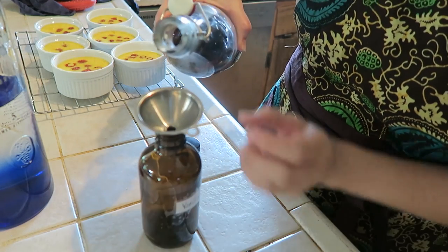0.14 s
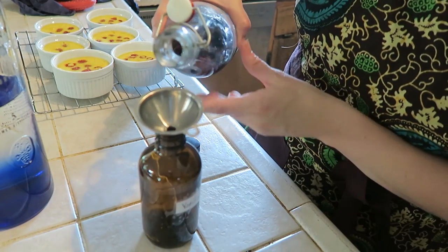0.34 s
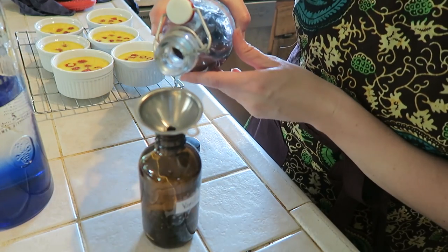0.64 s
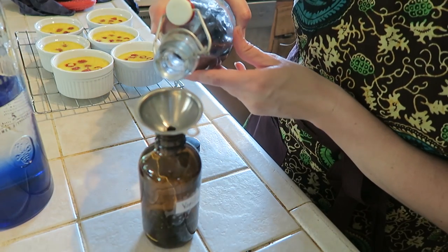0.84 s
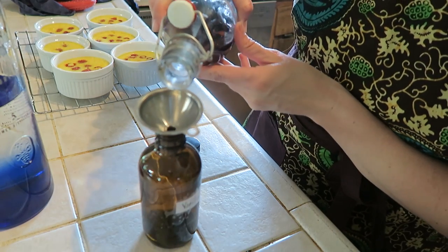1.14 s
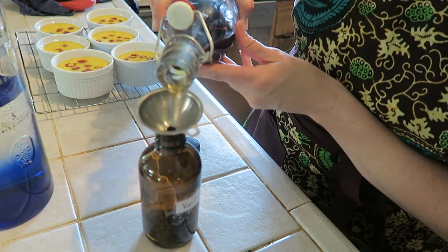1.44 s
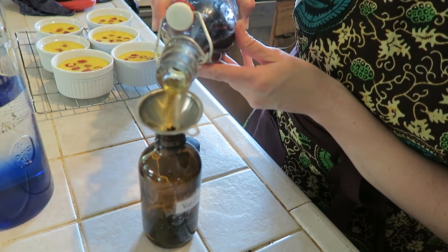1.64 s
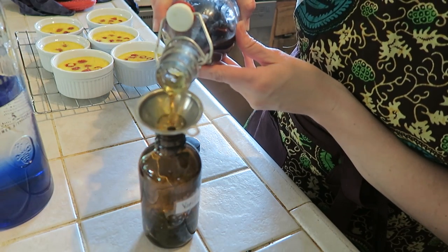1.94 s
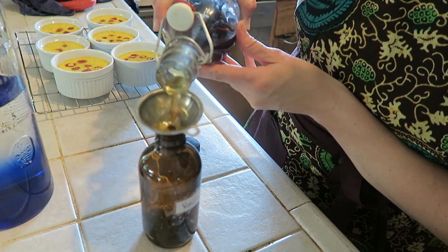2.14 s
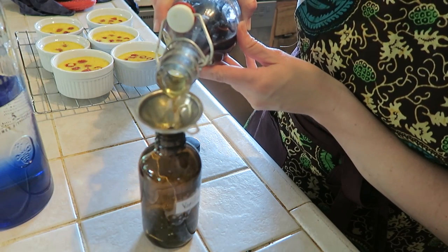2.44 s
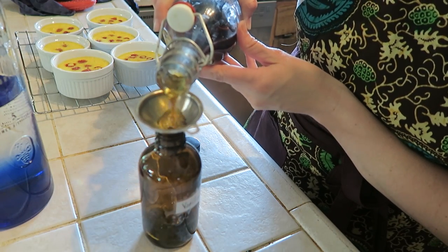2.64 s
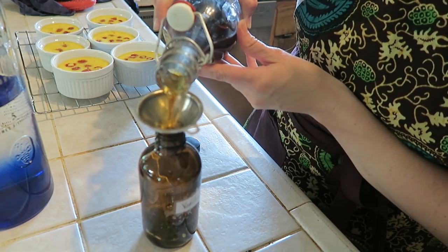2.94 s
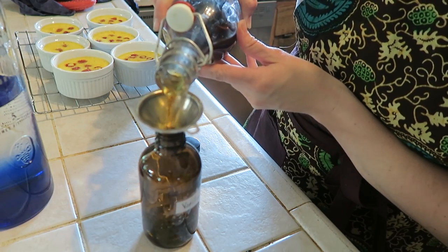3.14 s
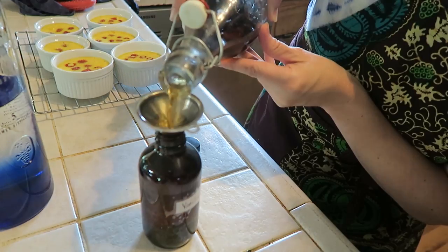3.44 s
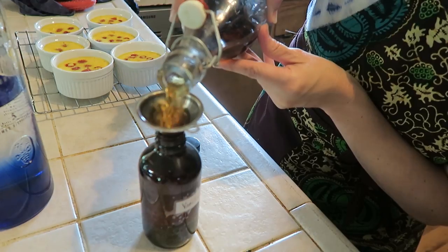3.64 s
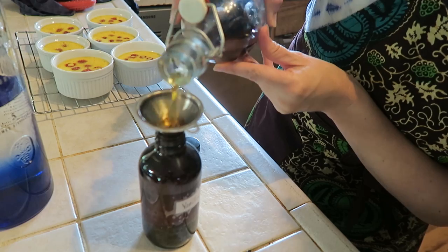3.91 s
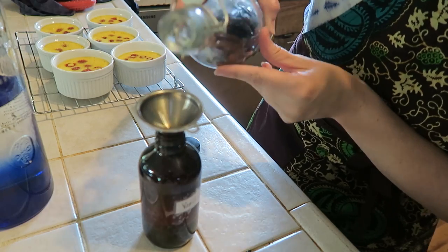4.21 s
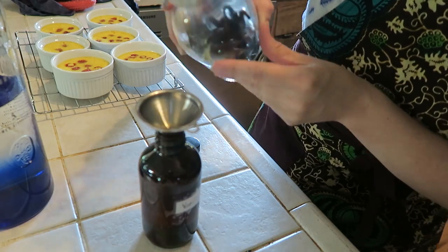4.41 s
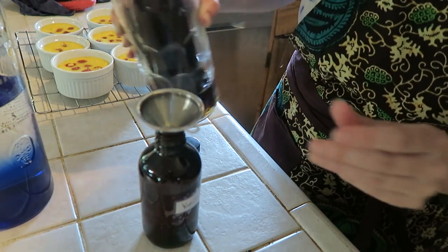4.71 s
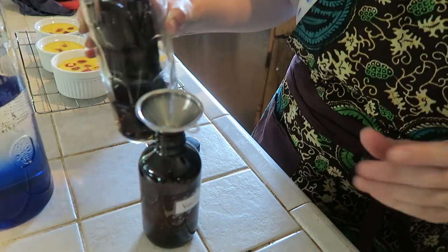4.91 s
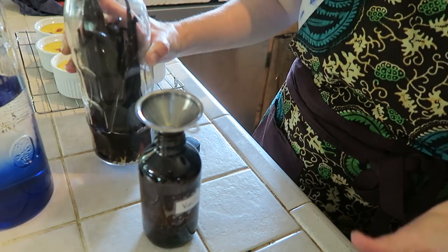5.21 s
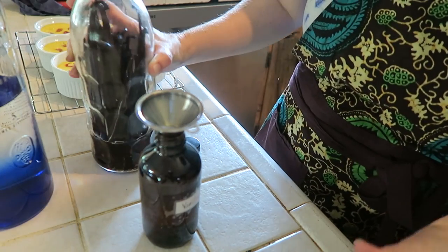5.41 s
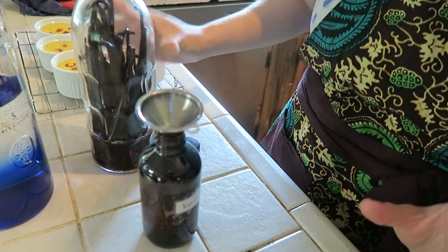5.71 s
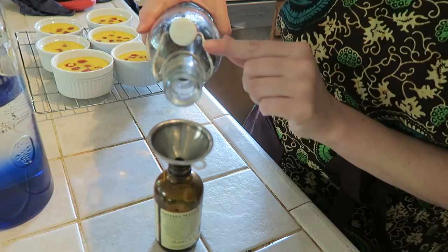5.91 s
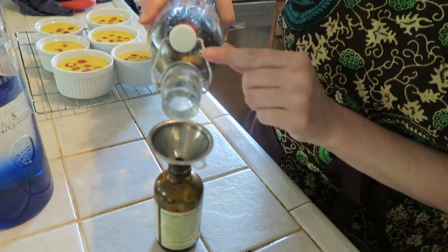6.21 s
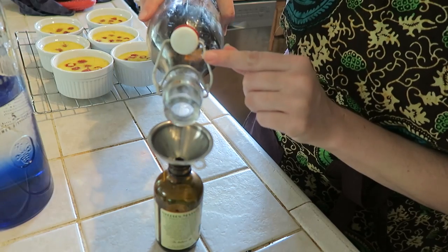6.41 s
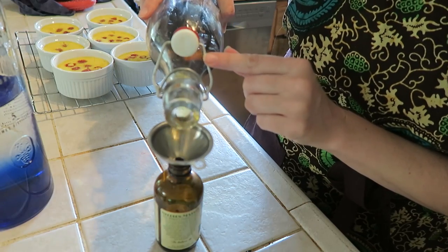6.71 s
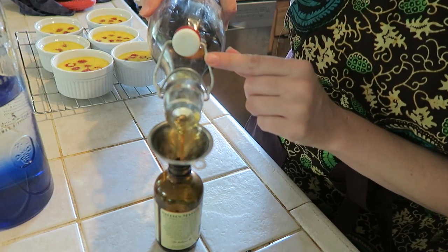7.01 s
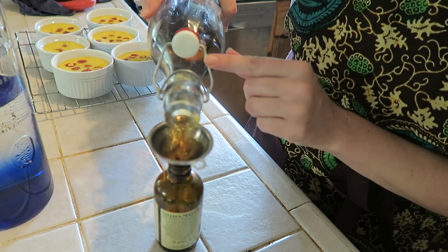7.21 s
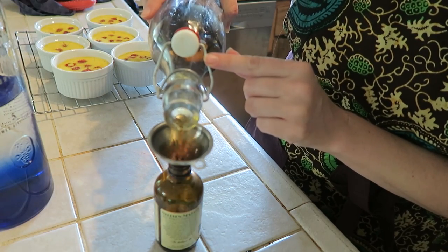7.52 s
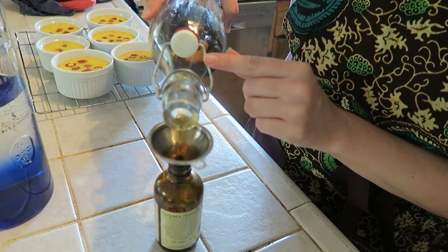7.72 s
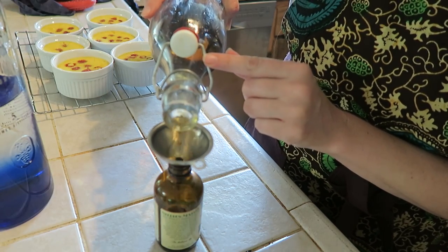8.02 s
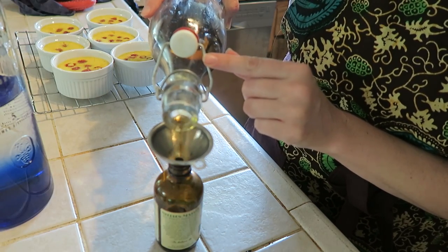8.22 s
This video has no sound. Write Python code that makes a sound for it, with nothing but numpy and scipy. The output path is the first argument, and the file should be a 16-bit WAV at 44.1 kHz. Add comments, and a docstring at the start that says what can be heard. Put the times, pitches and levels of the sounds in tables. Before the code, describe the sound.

Liquid splashes and drips through a funnel in a kitchen and a heavy glass bottle is set down, over birdsong and refrigerator hum.

```python
"""A kitchen with an open window. Over room tone and a humming refrigerator, a small bottle is briefly
dragged, its foot chattering. Birds outside begin to slur and whistle, and go on throughout. From 1.7 s
glass knocks on the tiled counter, liquid splashes on a metal funnel and bubbles ring as it glugs through.
At 5.5 s a large bottle is set down hard and rocks to rest on the booming counter; then the birds carry on,
with two last drips."""
import sys
import numpy as np
from scipy import signal
from scipy.fft import rfft, irfft
from scipy.io import wavfile
from scipy.ndimage import uniform_filter1d

SR = 44100
rng = np.random.default_rng(int(sys.argv[2]) if len(sys.argv) > 2 else 0)


def inscribe(sig):
    """Save sig as 16-bit PCM at rate SR to the path in sys.argv[1].

    A 1-D sig is mono; a 2-D sig holds one channel per row.
    Samples are clipped to [-1, 1] before scaling.
    """
    pcm = np.round(np.clip(np.atleast_2d(sig).T, -1, 1) * 32767)
    wavfile.write(sys.argv[1], SR, pcm.astype(np.int16))


N = 368235


def gain_of(db):
    return 10 ** (np.asarray(db) / 20)


def unit_rms(x):
    return x / np.sqrt(np.mean(x ** 2) + 1e-20)


def curve_at(points, hz):
    point_hz, value = np.transpose(points)
    return np.interp(np.log(hz + 1), np.log(point_hz + 1), value)


def add(mix, start_s, sound):
    part = mix[max(round(start_s * SR), 0):][:len(sound)]
    part += sound[:len(part)]


def wander(shape, *spans):
    """Low-pass noise of rms 1, with one smoothing span for each axis."""
    x = rng.standard_normal(shape)
    for axis, span in enumerate(spans):
        x = uniform_filter1d(uniform_filter1d(x, span, axis), span, axis)
    return unit_rms(x)


def stereo(common, opposed, coherence, hz):
    """Mid-side mixing: two independent spectra give a left and right of the chosen coherence."""
    alike = np.clip(curve_at(coherence, hz), 0, 1)[:, None]
    mid, side = common * np.sqrt((1 + alike) / 2), opposed * np.sqrt((1 - alike) / 2)
    return np.array([mid + side, mid - side])


def reverberation(x, decays, coherence, gap_s, lumps_db, rise_s):
    """Diffuse reflection: sparse echoes of random sign build up, then each band decays unevenly."""
    slots = np.arange(0, SR // 2, 20)
    taps = np.zeros((2, SR))
    arrivals = round(gap_s * SR) + slots + rng.integers(0, 20, (2, len(slots)))
    np.put_along_axis(taps, arrivals, rng.choice([-1., 1.], arrivals.shape), 1)
    hz, t, spectra = signal.stft(taps, SR, nperseg=256)
    decay_db = lumps_db * wander(spectra[0].shape, 2, 4) - 60 * t / curve_at(decays, hz)[:, None]
    spectra = stereo(*spectra, coherence, hz) * gain_of(decay_db)
    spectra *= np.sqrt(1 - np.exp(-(t + 0.0016) / rise_s))
    tail = signal.istft(spectra, SR, nperseg=256)[1]
    return signal.fftconvolve(x[None], tail / np.linalg.norm(tail[0]), axes=1)[:, :N]


def rings(events, modes, rise_s=0.001):
    """Free vibration: each (start_s, level_db) excites a sum of damped normal modes."""
    out, t = np.zeros(N), np.arange(SR // 2) / SR
    hz, db, t60 = np.transpose(modes)[:, :, None]
    ring = (gain_of(db - 60 * t / t60) * np.sin(2 * np.pi * hz * t)).sum(0)
    ring *= np.sin(np.pi / 2 * np.minimum(t / rise_s, 1)) ** 2
    for start_s, level_db in events:
        add(out, start_s, gain_of(level_db) * ring)
    return out


def impacts(events, spectrum, modes, crunch_s, size=2048):
    """Impact excitation: a click and a crunch through a minimum-phase filter, plus ringing modes."""
    t = np.arange(size) / SR
    log_gain = np.log(gain_of(curve_at(spectrum, abs(np.fft.fftfreq(2 * size, 1 / SR)))))
    pulse = np.fft.ifft(np.exp(np.conj(signal.hilbert(log_gain)))).real[:size]
    out = rings([(start_s, peak_db + ring_db) for start_s, peak_db, ring_db in events], modes)
    for start_s, peak_db, _ in events:
        crunch = 0.57 * rng.standard_normal(size) * np.exp(-t / crunch_s)
        crunch[0] = 1  # the click
        contact = np.convolve(crunch, pulse)
        add(out, start_s, gain_of(peak_db) * contact / abs(contact).max())
    return out


DEEPEN_S = 3.385  # the background gains bass here
AIR_SPECTRUM = [(25, -76.5), (60, -74), (150, -70), (220, -71), (310, -81), (420, -76), (700, -83),
                (1550, -86), (1750, -91.5), (3200, -95.5), (5000, -102), (8000, -108.5), (12000, -115),
                (13000, -124), (15500, -120)]  # room noise density: frequency_hz, level_db
EARLY_TILT = [(30, -8), (100, -4), (300, 0), (1500, 3), (5000, 0)]  # its colouring before DEEPEN_S: frequency_hz, gain_db
AIR_COHERENCE = [(60, 1), (200, 0.84), (500, 0.049), (2000, 0.48), (6000, 0.022), (12000, 0.04)]  # its left-right likeness: frequency_hz, coherence


def room_tone():
    """Broadband noise: random spectra with faint drifting patches, thinner in the bass at first."""
    frames, hz = N // 256 + 5, np.fft.rfftfreq(1024, 1 / SR)
    mid_re, mid_im, side_re, side_im, patches = rng.standard_normal((frames, 513, 5)).T
    patches = unit_rms(uniform_filter1d(uniform_filter1d(patches, 12, 0), 14, 1))
    early = np.arange(frames) * 256 / SR < DEEPEN_S
    db = curve_at(AIR_SPECTRUM, hz)[:, None] + curve_at(EARLY_TILT, hz)[:, None] * early + 2 * patches
    noise = stereo(mid_re + 1j * mid_im, side_re + 1j * side_im, AIR_COHERENCE, hz)
    return signal.istft(noise * gain_of(db) * np.sqrt(SR / 1024), nperseg=1024, noverlap=768)[1][:, :N]


HUM_LINES = [(120.9, -45.5, 0.17), (241, -52, 0.46), (371, -62.5, 5.7)]  # refrigerator partials: pitch_hz, level_db, width_hz


def refrigerator():
    """Forced vibration: mains-driven hum lines waver in level and phase, 3 dB softer at first."""
    t, out = np.arange(N) / SR, np.zeros(N)
    for hz, db, width_hz in HUM_LINES:
        pole = np.exp(-np.pi * width_hz / SR)
        drift = signal.lfilter([1], [1, -2 * pole, pole * pole], rng.standard_normal((2, N)))
        waver = 1 + 0.22 * (unit_rms(drift[0]) + 1j * unit_rms(drift[1]))
        out += gain_of(db) * np.sqrt(2) * (waver * np.exp(2j * np.pi * hz * t)).real
    return out * gain_of(np.where(t < DEEPEN_S, -3, 0))


DRAG_SPECTRUM = [(150, -18.5), (350, -18), (520, -3.5), (700, 0), (1200, -10), (2000, -10.5), (2700, -10),
                 (3800, -24.5), (4600, -40), (9000, -76)]  # contact of the dragged foot: frequency_hz, level_db
SMALL_BOTTLE_MODES = [(765, 4.5, 0.023), (1775, -11.5, 0.2), (2680, -8, 0.073), (4970, -33, 0.27),
                      (5360, -29, 0.48), (5460, -41, 0.45), (10800, -36, 0.17)]  # glass resonances: pitch_hz, level_db, t60_s


def dragged_bottle(length_s=0.105, gap_s=0.011, fade_db_per_s=41, ring_db=-10):
    """Friction chatter: the small bottle's foot makes a fading train of uneven impacts."""
    slots_s = np.arange(0, length_s, gap_s)
    lateness, strength = rng.uniform(0, 1, (len(slots_s), 2)).T
    starts_s = slots_s + 0.5 * gap_s * lateness
    peaks_db = -15 - fade_db_per_s * slots_s + 5 * (2 * strength - 1)
    contacts = [(start_s, peak_db, ring_db) for start_s, peak_db in zip(starts_s, peaks_db)]
    return impacts(contacts, DRAG_SPECTRUM, SMALL_BOTTLE_MODES, crunch_s=0.019)


# gliding bird notes: start_s, length_s, first_hz, last_hz, level_db, slow_glide_share
SLUR_NOTES = [(0.201, 0.16, 4655, 1355, -48, 0.28), (0.632, 0.16, 4745, 1050, -50.5, 0.24),
              (0.928, 0.17, 4790, 1308, -50.5, 0.37), (1.35, 0.17, 4680, 1190, -52.5, 0.23),
              (1.7, 0.17, 4990, 1633, -52.5, .45), (2.175, 0.21, 4740, 2030, -51.5, .4),
              (2.502, 0.19, 5460, 4910, -55, .4), (2.559, 0.21, 4510, 4020, -49, 0.46),
              (2.705, 0.061, 4095, 1440, -45.5, 0.14), (2.744, 0.046, 1964, 1390, -40, 0.47),
              (2.982, 0.163, 5435, 1790, -43.5, 0.36), (3.136, 0.034, 1497, 700, -48.5, .4),
              (3.299, 0.077, 4880, 5170, -50, 0.72), (4.814, 0.063, 4760, 4380, -54, .4),
              (4.889, 0.1, 4203, 2096, -49, 0.47), (5.179, 0.13, 4750, 2190, -54.5, 0.42),
              (5.802, 0.11, 4040, 3290, -62, 0.45), (5.875, .092, 4370, 3920, -62.5, 0.35),
              (6.263, 0.041, 2930, 2540, -69, 0.38), (6.93, 0.1, 3840, 1995, -65.5, .3),
              (7.36, 0.07, 3350, 2470, -67.5, 0.33), (7.55, 0.08, 3570, 2480, -65, 0.74),
              (7.7, 0.11, 4710, 3310, -65, 0.51), (7.8, 0.047, 3080, 2400, -52.5, 0.695),
              (8.11, 0.12, 3380, 2090, -56.5, 0.46), (8.25, 0.056, 4890, 4300, -56.5, 0.37),
              (8.278, 0.021, 1630, 990, -48, 0.36)]


def slurs(paths=3, swell_db_per_octave=8, flutter_db=4.5, attack_s=0.018):
    """Frequency glide: a ragged tone drifts, then typically drops fast and loud; one row per echo path."""
    out = np.zeros((paths, N))
    for k, (start_s, length_s, first_hz, last_hz, db, slow_share) in enumerate(SLUR_NOTES):
        u = np.arange(0, 1, 1 / (length_s * SR))
        jitter, flutter = (wander(SR // 4, span)[:len(u)] for span in (70, 110))
        glide = slow_share * u ** 1.6 + (1 - slow_share) * u ** 7
        hz = (first_hz + (last_hz - first_hz) * glide) * (1 + 0.021 * jitter)
        swell_db = swell_db_per_octave * np.log2(first_hz / last_hz) * u ** 5.4
        sag_db = -4 * np.sin(np.pi * u ** 2)
        level = gain_of(db + swell_db + sag_db + flutter_db * flutter)
        edges = np.minimum(u * length_s / attack_s, 1) * signal.windows.tukey(len(u), 0.1)
        add(out[k % paths], start_s, level * edges * np.sin(2 * np.pi * np.cumsum(hz) / SR))
    return out


# held bird notes: start_s, length_s, first_hz, last_hz, level_db, loudest_at_share
WHISTLE_NOTES = [(.235, 0.064, 5170, 5340, -55, .4), (1.06, .15, 3700, 3700, -60, 0.34),
                 (1.8, 0.17, 4170, 4030, -53.5, 0.3), (3.44, 0.067, 3120, 3090, -65, 0.44),
                 (4.275, 0.11, 2594, 2735, -49, 0.61), (4.355, 0.13, 2695, 2733, -51, 0.43),
                 (4.539, 0.18, 2564, 2733, -53, 0.53), (4.877, 0.084, 2795, 2730, -57, 0.29),
                 (6.175, 0.13, 2390, 2530, -60, 0.6), (6.33, 0.028, 2470, 2500, -66, .6),
                 (6.4, 0.126, 2754, 2935, -61.5, 0.44), (6.525, 0.12, 2880, 2990, -52, 0.17),
                 (6.718, 0.29, 2906, 2980, -55.5, 0.35), (7.21, 0.06, 2040, 2026, -59, .5),
                 (7.645, 0.16, 2395, 2530, -56, 0.6), (8.057, 0.11, 3100, 3470, -68, 0.67)]


def whistles(edge_db=-10, wobble=0.005):
    """Amplitude modulation: held tones swell and sink, flickering as their paths interfere."""
    out = np.zeros(N)
    for start_s, length_s, first_hz, last_hz, db, crest in WHISTLE_NOTES:
        u = np.arange(0, 1, 1 / (length_s * SR))
        waver = 1 + wobble * wander(SR // 2, 500)[:len(u)]
        hz = (first_hz + (last_hz - first_hz) * u ** 0.634) * waver
        tone = np.sqrt(2) * np.sin(2 * np.pi * np.cumsum(hz) / SR)
        from_crest = np.where(u < crest, 1 - u / crest, (u - crest) / (1 - crest))
        envelope = gain_of(db + edge_db * from_crest ** 1.25) * signal.windows.tukey(len(u), 0.4)
        add(out, start_s, envelope * tone)
    return out * (0.85 + 0.5 * wander(N, 400))


GARDEN_DECAY = [(1500, 0.34), (3000, 0.56), (4300, 0.33), (5500, 0.24)]  # outdoor reverberation: frequency_hz, t60_s
GARDEN_COHERENCE = [(1500, 1), (5000, 0.68)]  # its left-right likeness: frequency_hz, coherence
ECHO_BREAKS = [3.385, 5.985]  # moments when the outdoor echoes break off: time_s
WINDOW_RESPONSE = [(1000, 5), (1600, 6), (1950, 1.5), (2400, 3.5), (3100, 6.5), (3800, 4), (4600, -1),
                   (5500, -3)]  # transmission through the open window: frequency_hz, gain_db


def birds():
    """Multipath propagation: far song arrives mostly as echoes, filtered by the window opening."""
    gliding, held = slurs(), whistles()
    direct = gain_of(-17) * gliding.sum(0) + gain_of(-0.5) * held
    out = np.array([direct, direct])
    stretch = np.searchsorted(ECHO_BREAKS, np.arange(N) / SR)
    for song in gliding + gain_of(-12.5) * held:
        for k in range(len(ECHO_BREAKS) + 1):
            gate = stretch == k
            out += gate * reverberation(gate * song, GARDEN_DECAY, GARDEN_COHERENCE,
                                        gap_s=0.0043, lumps_db=2.5, rise_s=0.017)
    transmission = gain_of(curve_at(WINDOW_RESPONSE, np.fft.rfftfreq(N, 1 / SR)))
    return irfft(rfft(out) * transmission, N)


KNOCK_HITS = [(1.66, -18, -38), (1.6635, -27, -30), (1.668, -22, -26), (1.675, -29, -30), (2.089, -27, -24),
              (2.318, -36, -32), (2.3335, -14, -13), (2.344, -18, -23), (2.355, -18, -30),
              (2.5145, -13.5, -12.5), (2.528, -17, -49), (2.538, -21, -7.5), (2.629, -18, -12.5),
              (2.635, -27.5, -35), (2.642, -32, -31), (3.118, -29.5, -30)]  # glass meeting tile: start_s, peak_db, relative_ring_db
KNOCK_SPECTRUM = [(350, -30.5), (750, 6), (1300, -7.5), (2300, 1), (3300, -9), (4300, -26), (9000, -62),
                  (15000, -66)]  # that contact: frequency_hz, level_db
GLASS_MODES = [(520, -14, .05), (800, -10, 0.071), (1150, -14, .05), (1800, -10, .07), (2314, -3, 0.08),
               (2850, 1, 0.085), (3400, -10, .05), (5200, -32, .12)]  # resonances of the knocked glass: pitch_hz, level_db, t60_s


def bottle_knocks():
    """Hard contact: light knocks on tile, some with a quick bounce, excite short-lived glass modes."""
    return impacts(KNOCK_HITS, KNOCK_SPECTRUM, GLASS_MODES, crunch_s=0.0034)


FUNNEL_SPLASHES = [(1.768, -55, 10700), (1.806, -54, 11300), (1.927, -60, 10300), (2.423, -57, 9200),
                   (2.645, -45.5, 6550), (2.698, -58, 12000), (2.778, -62, 7300), (2.965, -56, 9200),
                   (2.969, -41, 4800), (2.989, -62, 5100), (3.034, -55, 5600), (2.979, -52, 7200),
                   (3.439, -59, 9000)]  # liquid striking the metal cone: start_s, level_db, pitch_hz


def splashes(rise_s=0.0014, decay_s=0.013):
    """Band-limited noise: each splash is a soft-edged treble puff that breaks into droplets."""
    out, t = np.zeros(N), np.arange(3000) / SR
    envelope = np.exp(-t / decay_s) * (1 - np.exp(-t / rise_s))
    for start_s, db, hz in FUNNEL_SPLASHES:
        band = signal.butter(3, [0.86 * hz, 1.2 * hz], "bandpass", output="sos", fs=SR)
        puff = unit_rms(signal.sosfilt(band, rng.standard_normal(len(t))))
        droplets = gain_of(5 * wander(len(t), 40) - 3)
        add(out, start_s, gain_of(db) * puff * droplets * envelope)
    return out


def drips(start_s=2.85, end_s=4.2, per_s=14, low_hz=2350, high_hz=3700, cycles=16):
    """Random arrivals: faint drips of scattered level and pitch, as rows of bubbles."""
    draws = rng.uniform(0, 1, (round((end_s - start_s) * per_s), 3))
    return [(start_s + (end_s - start_s) * when, -59 + 12 * size, low_hz + (high_hz - low_hz) * pitch,
             cycles) for when, size, pitch in draws]


BUBBLES = [(2.597, -37, 2230, 25), (2.8761, -27.5, 3450, 23), (2.884, -29, 2460, 14),
           (2.9187, -23, 3250, 14), (2.944, -37, 3340, 25), (2.968, -19, 2424, 79), (2.968, -28, 3220, 8.9),
           (2.982, -25.5, 4300, 13), (2.981, -26, 2300, 14), (2.987, -33, 5100, 41), (3.024, -40, 2600, 18),
           (3.033, -16.5, 2610, 27), (3.033, -19, 3690, 12), (3.118, -39, 2180, 4), (3.424, -42, 3280, 15),
           (3.4245, -43, 2580, 33), (3.438, -49, 3700, 15), (3.454, -42, 2560, 38), (3.527, -48, 2600, 12),
           (3.686, -51, 3200, 39), (3.7996, -39, 2680, 19), (3.932, -43, 2390, 56), (3.935, -54, 3980, 25),
           (3.954, -50, 3280, 14), (4.012, -38, 2530, 45), (4.066, -49, 2700, 11), (4.095, -46, 2450, 220),
           (4.117, -31, 2120, 11), (4.118, -41.5, 3450, 28), (4.133, -43, 2210, 16), (7.278, -46, 2620, 12),
           (7.974, -43, 2230, 16)]  # louder glugs and drips in the funnel: start_s, peak_db, pitch_hz, decay_cycles


def glugs(rise_s=0.0007):
    """Bubble resonance: a pinched-off bubble starts softly and rings briefly, rising in pitch."""
    out, t = np.zeros(N), np.arange(1500) / SR
    for start_s, peak_db, hz, cycles in list(BUBBLES) + drips():
        decay = 7 * t * hz / max(cycles, 8)
        envelope = (1 - np.exp(-t / rise_s)) ** 3 * np.exp(-decay)
        phase = 2 * np.pi * hz * t * (0.962 + 0.015 * np.minimum(decay, 7))
        add(out, start_s, gain_of(peak_db) * envelope / envelope.max() * np.sin(phase))
    return out


THUD_HITS = [(5.4565, 2.5, -36), (5.474, -9, -45)]  # the large bottle lands, edge then base: start_s, peak_db, relative_ring_db
THUD_SPECTRUM = [(30, -37), (70, -5), (110, -6.5), (250, 4), (400, -3), (600, 1), (1100, -4.5),
                 (1550, -4.5), (2000, -13), (2800, -16), (5000, -32.5), (6200, -58), (7000, -37),
                 (9000, -73.5), (15000, -64)]  # that hard contact: frequency_hz, level_db
LARGE_BOTTLE_MODES = [(1890, -4, .2), (3106, -1, .44), (4861, -20, .25), (5905, -21, .33), (7585, -25, .2)]  # glass resonances: pitch_hz, level_db, t60_s
ROCK_HITS = [(5.484, -7), (5.493, -9), (5.503, -10), (5.514, -20), (5.527, -12.5), (5.553, -22),
             (5.570, -15.5), (5.578, -14), (5.588, -17), (5.615, -25), (5.626, -35), (5.64, -35)]  # its base rocks back down: start_s, peak_db
ROCK_SPECTRUM = [(60, -15.5), (200, 2.5), (350, -2), (600, 4), (1000, -6.5), (1600, -20.5), (2500, -23.5),
                 (8000, -67)]  # that soft, dull contact: frequency_hz, level_db
COUNTER_MODES = [(194, -2, .07), (420, -7, .06), (510, -2, .06), (600, -2, .07), (720, -4, .06),
                 (856, -2, .07), (1140, -9, .05), (1545, -10, .06)]  # counter resonances: pitch_hz, level_db, t60_s


def large_bottle(rock_ring_db=-20, boom_db=-9):
    """Impact excites both bodies: glass and counter ring, then the counter booms as the base rocks."""
    landing = impacts(THUD_HITS, THUD_SPECTRUM, LARGE_BOTTLE_MODES, crunch_s=0.0052)
    boom = rings([(start_s, db + boom_db) for start_s, db, _ in THUD_HITS], COUNTER_MODES)
    rocks = [(start_s, db, rock_ring_db) for start_s, db in ROCK_HITS]
    return landing + boom + impacts(rocks, ROCK_SPECTRUM, COUNTER_MODES, crunch_s=0.0054)


KITCHEN_DECAY = [(100, 0.62), (500, 0.39), (1500, 0.4), (4000, 0.16), (10000, 0.57)]  # indoor reverberation: frequency_hz, t60_s
KITCHEN_COHERENCE = [(100, 0.98), (300, 0.96), (1000, 0.96), (4000, 0.93), (9000, 0.1)]  # its left-right likeness: frequency_hz, coherence


def scene():
    """Superposition: direct kitchen sounds, their reverberant field, the birds and the background."""
    knocks, heavy, drag = bottle_knocks(), large_bottle(), dragged_bottle()
    liquid = glugs() + splashes()
    scatter = gain_of(-6) * splashes() * np.array([[1], [-1]])  # spray over the cone widens the image
    send = gain_of(-5) * knocks + gain_of(-3) * heavy + gain_of(-7.5) * drag + gain_of(-8.5) * liquid
    room = reverberation(send, KITCHEN_DECAY, KITCHEN_COHERENCE, gap_s=0.004, lumps_db=1.6, rise_s=0.001)
    return knocks + heavy + drag + liquid + scatter + room + birds() + room_tone() + refrigerator()


def record(dry, threshold_db=-28, slope=0.34, release_db_per_s=24.8, lag_samples=1500, edge_hz=15750):
    """Compression: the gain dips just after loud blows, the hardest clips, and a low-pass follows."""
    power_db = 10 * np.log10(abs(uniform_filter1d((dry ** 2).mean(0), 800)) + 1e-12)
    release_db = np.arange(N) * release_db_per_s / SR
    held_db = np.maximum.accumulate(power_db + release_db) - release_db
    over_db = np.maximum(held_db - threshold_db, 0)
    late_db = np.roll(uniform_filter1d(over_db, lag_samples), lag_samples)
    ducked = np.clip(dry / gain_of(slope * late_db), -1, 1)
    lowpass = signal.firwin(511, edge_hz, window=("kaiser", 9), fs=SR)
    return signal.oaconvolve(ducked, lowpass[None], "same")


dry = scene()
out = record(dry)
inscribe(out)
```